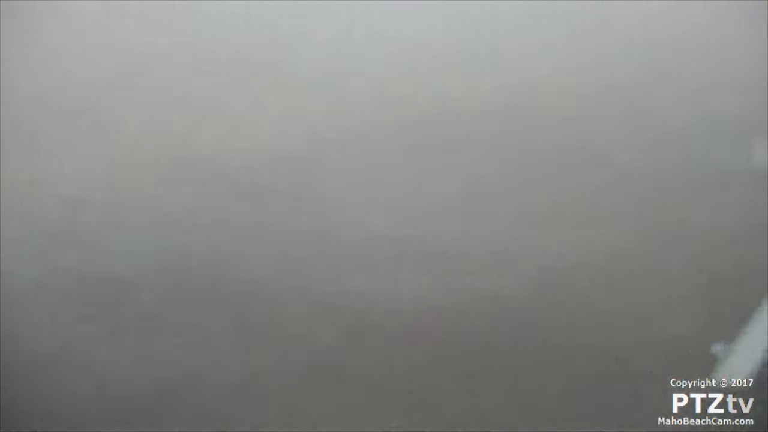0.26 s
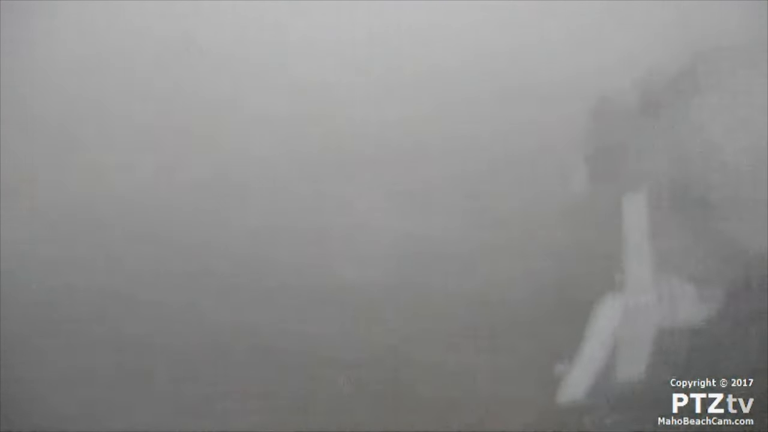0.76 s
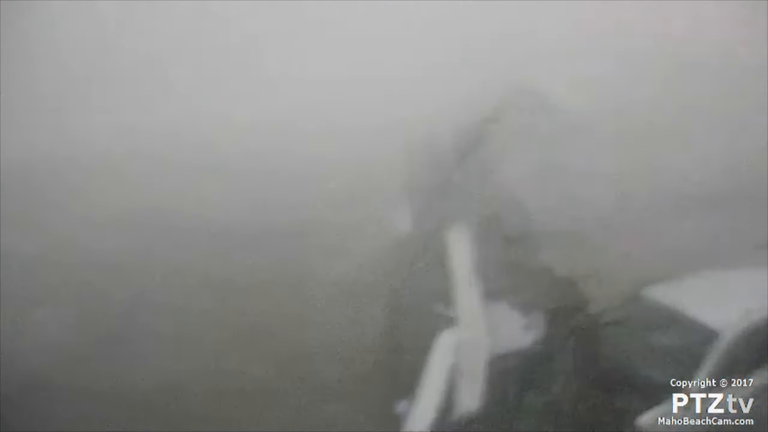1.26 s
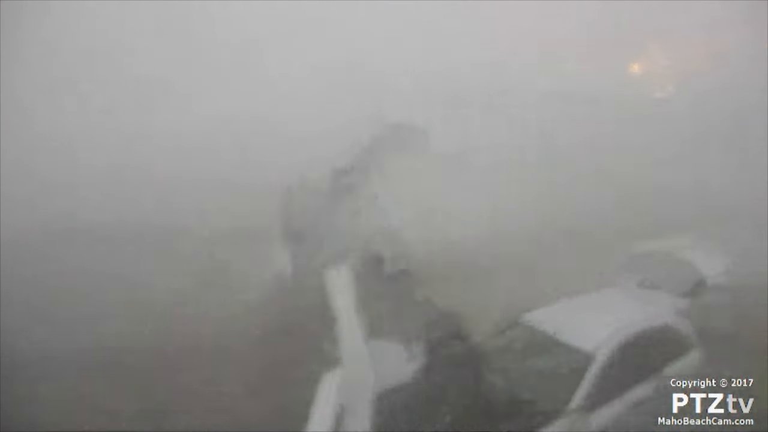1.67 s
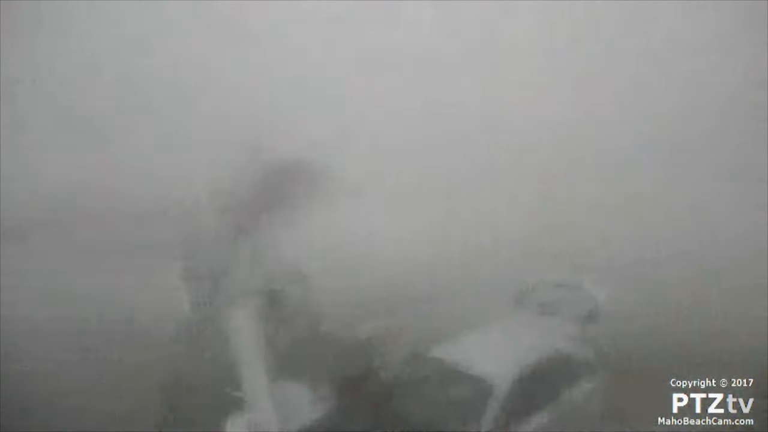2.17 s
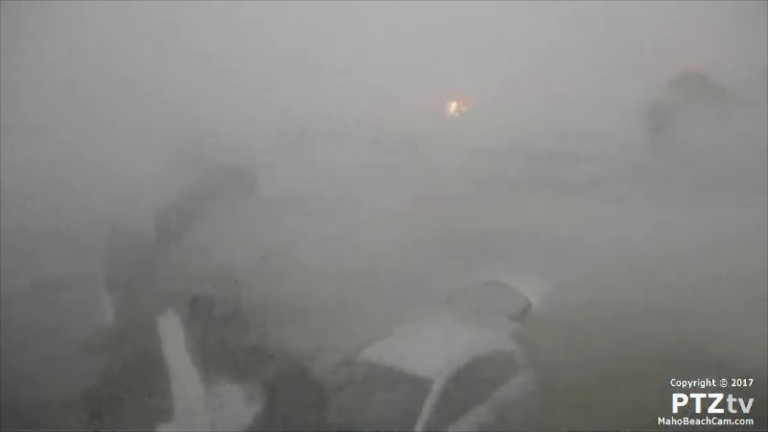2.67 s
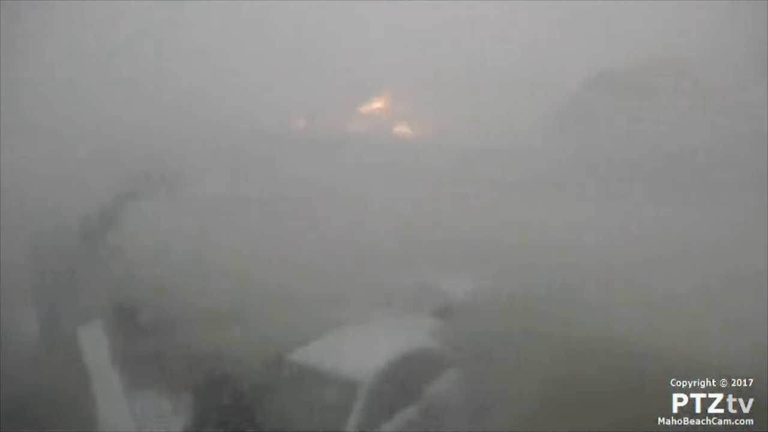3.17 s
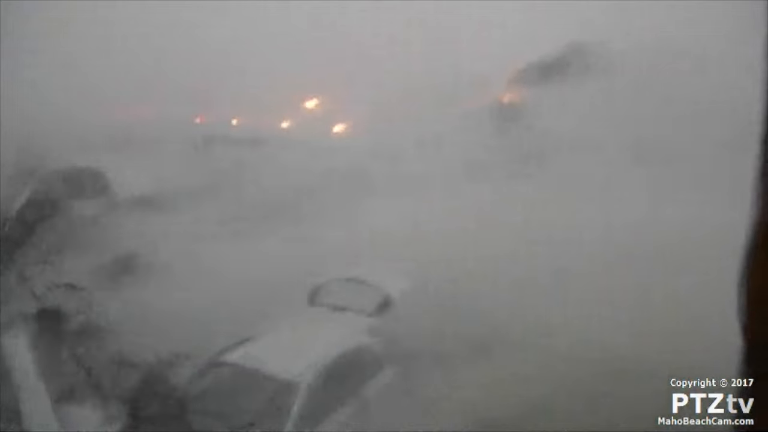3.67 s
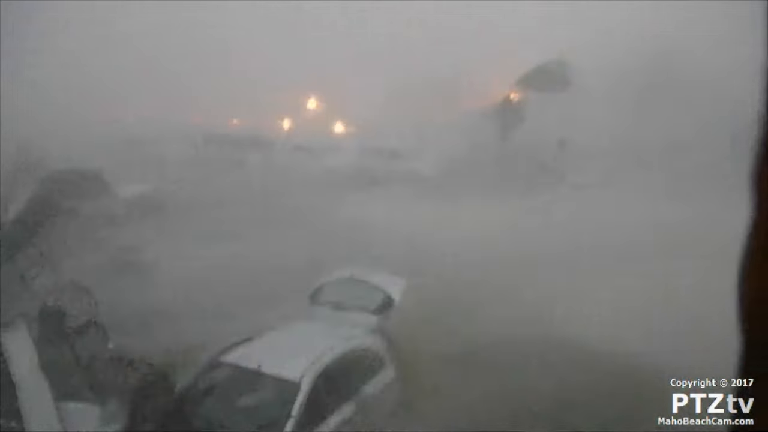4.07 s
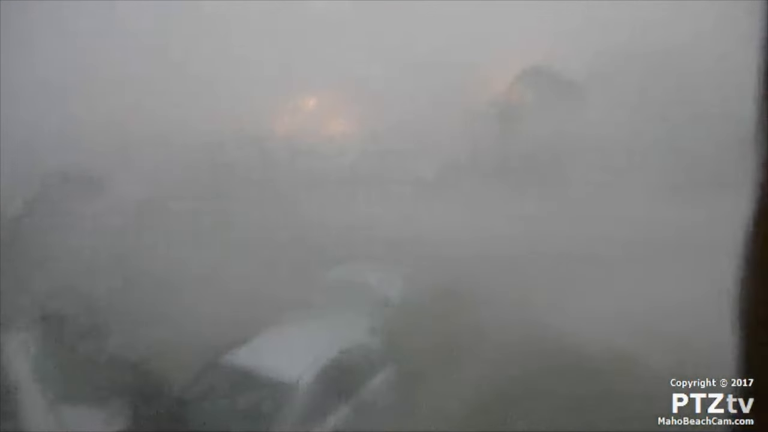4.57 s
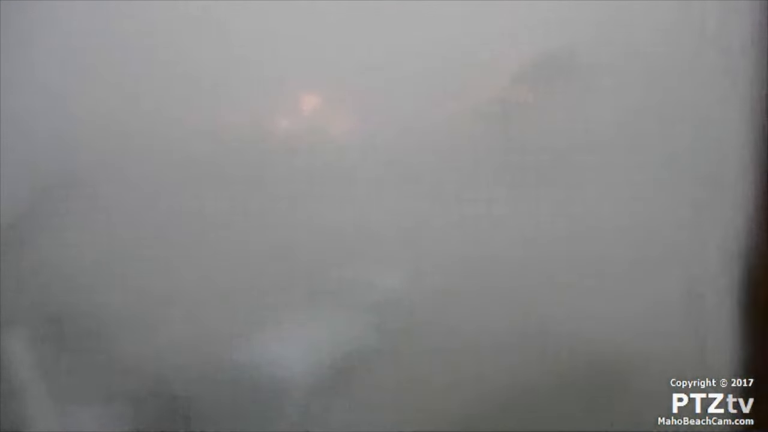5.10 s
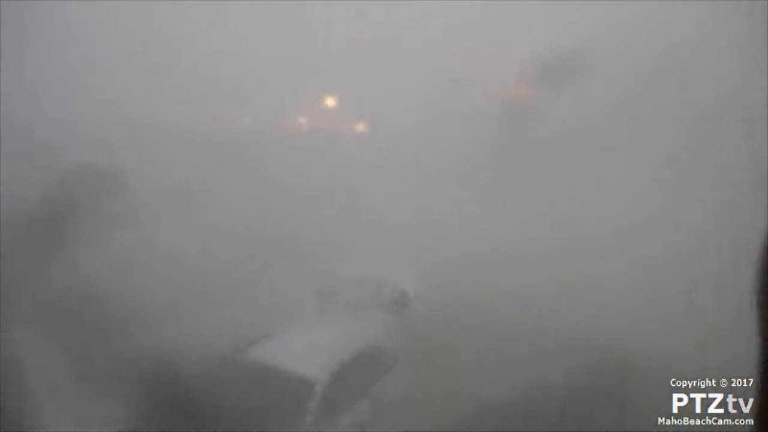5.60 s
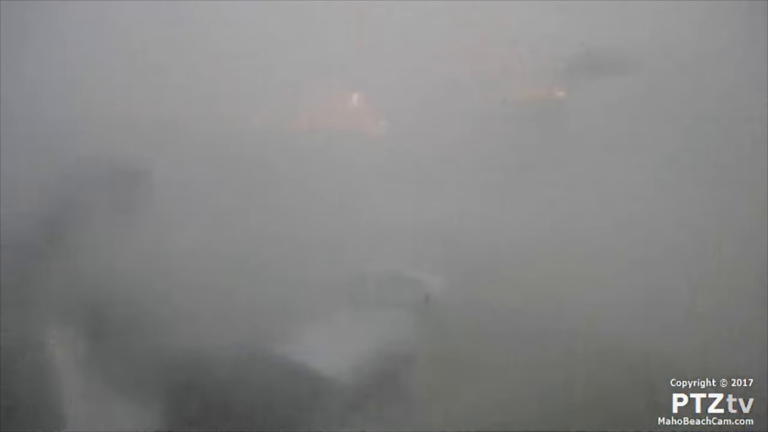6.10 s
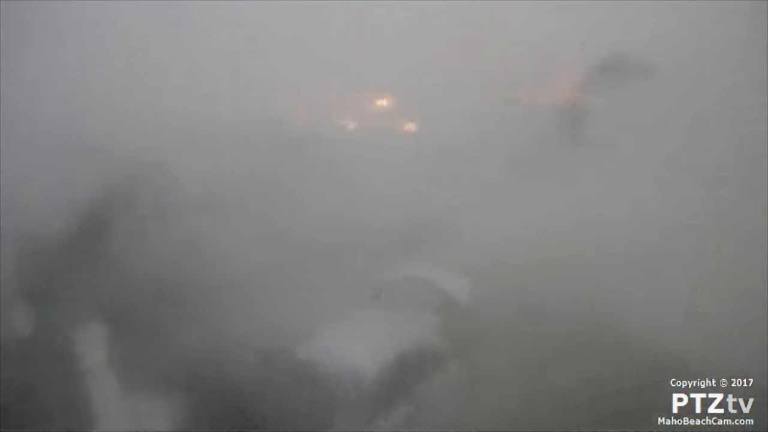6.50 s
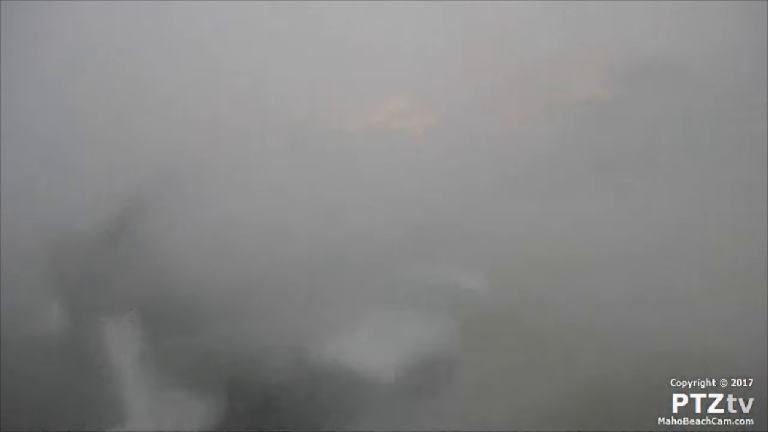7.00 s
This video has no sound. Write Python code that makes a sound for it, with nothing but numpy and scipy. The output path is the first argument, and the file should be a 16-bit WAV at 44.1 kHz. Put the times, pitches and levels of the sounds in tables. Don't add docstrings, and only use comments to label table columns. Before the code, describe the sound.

A hurricane blows straight into a small exposed microphone, already at full force at 0 s. Fast, lumpy low thumps around 100 Hz hit the housing, crushed into distortion, under a gusty middle rush and a broad roar with blurred, hollow howling. Rain hisses and fizzes in rapid uneven sheets. Buffeting opens hard, slackens near 0.9 s, and surges around 1.4 s; the airstream grows and turns brighter, strongest about 2.5 to 3.5 s. Heavy drops tick near 1.0, 1.7 and 2.8 s. The roar eases after 4 s, and the treble almost vanishes around 4.5 s before spray returns. Distinct slams land near 5.2 and 5.9 s, with more drop ticks from 5.4 to 6.1 s and a strong wash of rain about 6 s. Wind is somewhat weaker but unrelenting to the end just past 7 s, with a late thump near 7.1 s. Treble is limited, grainy and watery; there is no room echo.

```python
import sys
import numpy as np
from scipy import signal
from scipy.fft import rfft, irfft
from scipy.io import wavfile
from scipy.ndimage import uniform_filter1d

SR = 44100
rng = np.random.default_rng(int(sys.argv[2]) if len(sys.argv) > 2 else 0)


def put_to_file(sound):
    columns = np.atleast_2d(sound).T
    safe = np.clip(columns, -1, 1)
    whole_steps = np.round(safe * 32767)
    wavfile.write(sys.argv[1], SR, whole_steps.astype(np.int16))


def invert_db(x):
    u = np.asarray(x, float) / 20
    return 10 ** u


N = 319725

# time_s, level_db
FORCE = [(0, -11.5), (.5, -12), (.9, -12.5), (1.4, -9), (1.8, -11), (2.5, -10), (3.0, -9.5), (3.5, -11),
         (4.0, -12), (4.5, -11.5), (5.25, -13), (5.5, -15), (6.3, -15.5), (7.25, -17)]
# time_s, change_db
SLAMS = [(.05, 3.5), (.15, 2), (.25, 2.5), (.88, -4), (1.24, 2), (1.41, 1), (1.57, 2.5), (1.71, -5.5),
         (2.33, 2.5), (2.61, 4), (2.68, -7.5), (3.39, 3), (3.5, -4.5), (3.64, 3.5), (4.04, 0.5), (4.29, -3),
         (4.36, 1), (4.54, 1.5), (5.21, 7), (5.4, -3.5), (5.47, 3.5), (5.82, 2.5), (5.87, -3), (5.93, 8),
         (6.08, -0.5), (6.28, 2.5), (6.61, 1.5), (6.68, -2), (6.75, 2), (7.1, 5)]
# time_s, level_db, lean (-1 low pipe to 1 high pipe)
AIRSTREAM = [(0, -18, -1), (.4, -17.5, 0.07), (.65, -17, 0), (1.1, -14, 0.067), (1.55, -14, 0.87),
             (1.75, -12.5, .5), (2.4, -12.5, 0.11), (2.7, -11.5, -0.28), (3.3, -11, 0.98),
             (3.9, -14.5, -0.4), (4.55, -18, -0.42), (4.9, -16.5, -.4), (5.55, -18.5, -.6),
             (5.8, -17, -0.42), (6.25, -15.5, -0.21), (6.6, -17, 0), (6.9, -17.5, 0.16),
             (7.25, -15.5, -0.59)]
# time_s, change_db
SHEETS = [(.12, 8), (.47, -4), (.58, 5.5), (1.3, 1.5), (1.57, -5.5), (2.41, -6.5), (2.72, -0.5),
          (2.97, -7.5), (3.2, 4.5), (4.13, -2), (4.24, -1), (4.43, 6), (4.52, -7.5), (4.565, -8.5),
          (4.98, 4.5), (5.12, -1), (5.32, 6), (5.44, -3), (5.54, -6), (5.76, 5), (5.86, -3.5), (5.96, 0.5),
          (6.15, -3), (6.3, 3.5), (6.54, -4), (6.7, 4.5), (6.86, -2.5), (6.97, 4.5), (7.05, -2), (7.17, 6)]
SLAM_S, SHEET_S = .03, .035
LINK_SR, HOP, TOP_LINE = 16000, 1024, 884


def buffeting():
    # pitch_hz, density_db (per Hz)
    thump_colour = [(20, -27), (40, -16), (70, -4.5), (100, 1.5), (140, -2), (200, -8.5), (300, -19),
                    (600, -47)]
    shoulder_hz, shoulder_share, full_force_db = 150, .6, -11.
    thump = turbulence(thump_colour, size=4096, patchy_db=0.05, flicker_db=0.5)
    thump = steadied(thump, seconds=.05, share=.8)
    force_db = follow(FORCE, column=1)
    hz = np.fft.rfftfreq(N, 1 / SR)
    shoulder = irfft(rfft(thump) / (1 + (shoulder_hz / (hz + 1)) ** 8), N)
    shoulder_gain = invert_db(shoulder_share * (force_db - full_force_db))
    thump = thump + (shoulder_gain - 1) * shoulder
    return invert_db(force_db + swells(SLAMS, SLAM_S) + 5.0) * thump


def roar():
    # pitch_hz, density_db (per Hz)
    roar_colour = [(300, -23.5), (600, -6.5), (850, 0.5), (1100, -1.5), (1900, -3), (2400, -6.5),
                   (3500, -14), (7000, -35)]
    # pitch_hz, width_hz
    pipes = [
        (1330, 800),
        (1900, 800),
    ]
    # time_s, change_db
    surges = [(.11, 3), (.22, 2.5), (.39, -2), (.56, 3), (.95, -2), (1.05, 0.5), (1.33, 7), (1.39, -2),
              (1.43, 5.5), (1.51, 3), (1.68, 2), (2.14, 2), (2.36, 1.5), (2.48, 3), (2.52, 4.5), (2.66, 1),
              (2.74, 1), (2.89, 1), (3.33, 4.5), (3.49, 2.5), (4.42, 0.5), (4.6, 0), (4.68, 2.5), (4.73, 4),
              (5.03, 3), (5.26, 2), (5.6, -3.5), (6.45, -4), (6.98, 1.5), (7.17, 2)]
    howl_db, lean_swing_db = -2., 6.
    air = turbulence(roar_colour, size=1024, patchy_db=1.5, flicker_db=0.9)
    lean_db = lean_swing_db * follow(AIRSTREAM, column=2)
    mixed = air.copy()
    for side, (hz, width_hz) in zip((-1, 1), pipes):
        mixed += invert_db(howl_db + side * lean_db) * resonate(air, hz, width_hz)
    level_db = follow(AIRSTREAM, column=1) + swells(surges, half_s=0.018) + 5.0
    level_db += .3 * swells(SHEETS, SHEET_S)
    level_db -= .3 * swells(SLAMS, SLAM_S)
    return invert_db(level_db) * steadied(mixed, seconds=0.1, share=0.83)


def spray():
    # pitch_hz, density_db (per Hz)
    hiss_colour = [(800, -21), (2000, -7), (3000, 3), (3600, 1), (4000, -6), (5500, -12.5), (7000, -7),
                   (9000, -15)]
    # time_s, level_db
    rain = [(0, 2), (.4, -3), (1.0, -2), (1.7, -0.5), (2.6, 1), (3.3, -1), (4.0, 0), (4.9, 0.5), (5.5, -2),
            (6.0, 5), (6.9, -2), (7.25, 2)]
    drops_per_s = 2500
    drop_size = invert_db(3.9 * np.minimum(rng.exponential(1, N), 5)) * (rng.random(N) < drops_per_s / SR)
    kind = rng.integers(0, 16, N)
    fizz = np.zeros(N)
    for k, hz in enumerate(np.geomspace(1800, 6000, 16)):
        fizz += signal.oaconvolve(drop_size * (kind == k), tick(hz, cycles=1.4))[:N]
    hiss = turbulence(hiss_colour, size=512, patchy_db=1.5, flicker_db=4.0)
    level_db = 2. + 1.3 * follow(AIRSTREAM, column=1)
    level_db += follow(rain, column=1) + swells(SHEETS, SHEET_S)
    return invert_db(level_db) * steadied(hiss + .6 * evened(fizz), seconds=0.091, share=.8)


def drops():
    # time_s, peak_db, ring_hz
    big_drops = [(0.195, -17, 3460), (1.0195, -6.5, 3560), (1.6605, 0, 2700), (2.7866, 2, 2700),
                 (2.848, -20, 3000), (4.7176, -1.5, 3000), (5.358, -1, 3380), (5.386, -21, 3100),
                 (5.473, -7, 3030), (5.4878, -9, 3260), (5.5702, -11, 3170), (5.682, -12, 2970),
                 (5.738, -13.5, 3480), (5.927, -1, 3270), (5.9977, -15, 2900), (6.0797, -3, 2840),
                 (6.9624, -7, 3300), (7.1535, -9, 3360)]
    out = np.zeros(N + 200)
    for s, peak_db, hz in big_drops:
        start = round(s * SR)
        out[start:start + 200] += invert_db(min(peak_db, -3.)) * tick(hz, cycles=1.7)
    return out[:N]


def tick(hz, cycles):
    turns = np.arange(200) * hz / SR
    return np.sin(2 * np.pi * turns) * np.exp(-turns / cycles)


def rush():
    # pitch_hz, density_db (per Hz)
    rush_colour = [(100, -13.5), (200, -0.5), (300, -2.5), (500, -6), (800, -10.5), (1300, -29.5)]
    # time_s, change_db
    puffs = [(.1, 4.5), (.2, 5.5), (.26, -4), (.45, -3), (.53, 1), (.67, -2), (.85, 4), (.98, 4),
             (1.25, 6.5), (1.42, -5), (1.5, -4), (1.68, 5.5), (1.78, 2.5), (1.88, -4), (2.2, 1.5),
             (2.7, 3.5), (4.1, 3), (4.4, -3), (4.75, -3), (5.0, 1.5), (5.17, 2), (5.33, 6.5), (5.55, -4.5),
             (5.68, -5.5), (5.9, 1.5), (6.35, -5), (6.6, -5), (6.75, 2), (7.05, 4)]
    level_db = 5. + 1.4 * follow(FORCE, column=1)
    level_db -= .3 * swells(SLAMS, SLAM_S)
    level_db += swells(puffs, half_s=.04)
    eddies = turbulence(rush_colour, size=2048, patchy_db=1.3, flicker_db=1.0)
    return invert_db(level_db) * steadied(eddies, seconds=.08, share=.6)


def shelter():
    # start_s, length_s, change_db
    lulls = [(0.059, 0.012, -5), (0.13, 0.016, -10), (1.393, 0.0066, -7), (1.413, 0.0078, -8.5),
             (1.451, 0.0082, -4.5), (2.494, 0.017, -5), (2.612, 0.017, -3), (4.503, 0.058, 1),
             (4.699, 0.014, -12), (4.768, 0.0087, -15), (5.21, 0.011, 0)]
    dip_db = np.zeros(N)
    for s, length_s, depth_db in lulls:
        dip_db[round(s * SR):round((s + length_s) * SR)] = depth_db
    return invert_db(uniform_filter1d(dip_db, size=100))


def turbulence(shape, size, patchy_db, flicker_db):
    frames, hz = 4 * N // size + 5, np.fft.rfftfreq(size, 1 / SR)
    a, b, patches = rng.standard_normal((frames, len(hz), 3)).T
    patches = uniform_filter1d(patches, size=size // 64, axis=0)
    patches = evened(uniform_filter1d(patches, size=8, axis=1))
    flicker = evened(uniform_filter1d(rng.standard_normal(frames), size=5))
    level_db = read(shape, hz)[:, None] + patchy_db * patches + flicker_db * flicker
    z = (a + 1j * b) * invert_db(level_db)
    return evened(signal.istft(z, nperseg=size, noverlap=3 * size // 4)[1][:N])


def resonate(x, hz, width_hz):
    turn = np.exp(2j * np.pi * hz * np.arange(N) / SR)
    r = np.exp(-np.pi * width_hz / SR)
    smooth = signal.lfilter([(1 - r) ** 2], [1, -2 * r, r ** 2], x / turn)
    return 2 * (turn * smooth).real


def steadied(x, seconds, share):
    size = int(seconds * SR)
    power = uniform_filter1d(uniform_filter1d(x ** 2, size=size), size=size)
    return evened(x / (abs(power) + 1e-6) ** (share / 2))


def follow(rows, column):
    rows = np.array(rows)
    return np.interp(np.arange(N) / SR, rows[:, 0], rows[:, column])


def swells(rows, half_s):
    t = np.arange(0, N, 64) / SR
    s, db = np.transpose(rows)
    bells = np.exp(-((t[:, None] - s) / half_s) ** 2)
    return np.interp(np.arange(N) / SR, t, bells @ db)


def evened(x):
    return x / np.sqrt(np.mean(x ** 2) + 1e-20)


def read(points, hz):
    f, value = np.transpose(points)
    return np.interp(np.log(hz + 1), np.log(f + 1), value)


def scene():
    return (buffeting() + rush() + shelter() * (roar() + spray()) + drops())[None]


def overload(x):
    ceiling, knee = .475, 30
    flat = ceiling * x / (ceiling ** knee + abs(x) ** knee) ** (1 / knee)
    flat = signal.lfilter(*signal.butter(1, 9000, fs=SR), flat)
    return signal.lfilter(*signal.butter(1, 8, "high", fs=SR), flat)


def shaped_link(x):
    treble = above(x, 2000)
    quick, slow = (uniform_filter1d(uniform_filter1d(treble ** 2, size=n), size=n) for n in (100, 900))
    jump_db = 10 * np.log10((abs(quick) + 1e-9) / (abs(slow) + 1e-9))
    jump_db = np.sign(jump_db) * np.maximum(abs(jump_db) - 2.5, 0)
    gain = invert_db(uniform_filter1d(uniform_filter1d(jump_db, size=48), size=48))
    sent = link(x + treble * (1 / gain - 1))
    return sent + above(sent, 2000) * (gain - 1)


def above(x, hz):
    f = np.fft.rfftfreq(len(x), 1 / LINK_SR)
    return irfft(rfft(x) * np.clip((f - hz) / 400, 0, 1), len(x))


def link(x):
    # pitch_hz, step_db
    step_points = [(0, -6), (150, -11), (400, -3.5), (800, -2), (2100, -2), (2400, 3.2), (3400, 3.8),
                   (4100, 8.8), (6900, 8.6)]
    n, k = np.arange(2 * HOP), np.arange(HOP)
    carried = k < TOP_LINE
    window = signal.windows.kaiser_bessel_derived(2 * HOP, 4 * np.pi)
    cosines = np.cos(np.pi / HOP * np.outer(n + .5 + HOP / 2, k + .5))
    basis = window[:, None] * cosines * np.sqrt(2 / HOP)
    blocks = np.pad(x, (HOP, 2 * HOP - len(x) % HOP)).reshape(-1, HOP)
    lines = np.hstack([blocks[:-1], blocks[1:]]) @ basis * carried
    band = np.floor(11 * np.log(1 + k / 70)).astype(int)
    member = band[:, None] == np.arange(band.max() + 1)
    power = lines ** 2 @ member / np.maximum(carried @ (1. * member), 1)
    raw_db = 10 * np.log10(power + 1e-9)
    power_db = uniform_filter1d(raw_db, size=3, axis=1)
    last = band[TOP_LINE]
    power_db[:, last] = power_db[:, last - 1] = raw_db[:, last - 1]
    budget_db = 1.3 * rng.standard_normal((len(lines), 1)) * (k < 520)
    step = invert_db(power_db[:, band] + read(step_points, k * LINK_SR / 2 / HOP) + budget_db)
    kept = np.sign(lines) * step * np.floor((abs(lines) / step) ** .75 + .4054) ** (4 / 3)
    halves = (kept * starved(count=len(kept))) @ basis.T
    return (halves[:-1, HOP:] + halves[1:, :HOP]).ravel()[:len(x)]


def starved(count):
    # time_s, loss_db
    faint = [
        (.448, -2.5),
        (4.544, -8),
        (5.12, -3),
        (5.44, -3),
        (5.568, -2),
        (6.848, 1),
    ]
    loss_db = np.zeros(count)
    for s, db in faint:
        loss_db[round(s * LINK_SR / HOP) + 2] = db
    hz = np.arange(HOP) * LINK_SR / 2 / HOP
    return invert_db(loss_db[:, None] * np.clip(hz / 3000 - 1, 0, 1))


def roll_off(x):
    return signal.sosfilt(signal.butter(12, 8210, fs=SR, output="sos"), x)


def record(dry):
    lead = 45
    flat = overload(dry[0])
    slow = signal.resample_poly(np.pad(flat, (4410 - lead, 441), "reflect"), 160, 441)
    spare = -1600 % HOP
    received = shaped_link(np.pad(slow, (spare, 0)))[spare:]
    received = np.clip(received, -.93, .93)
    back = signal.resample_poly(received, 441, 160, window=("kaiser", 10))
    mix = back[4410 - lead:][:N][None]
    return roll_off(mix)


dry = scene()
out = record(dry)
put_to_file(out)
```